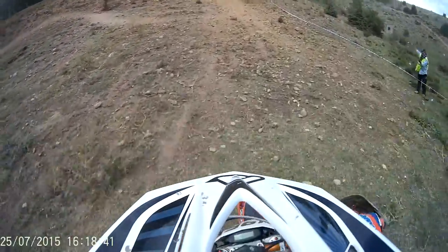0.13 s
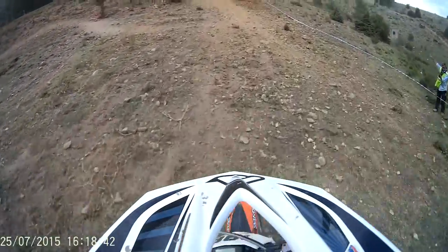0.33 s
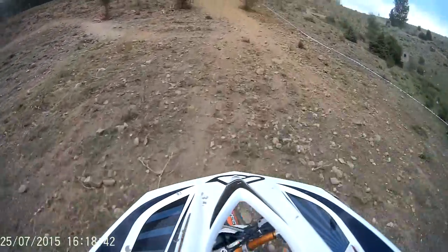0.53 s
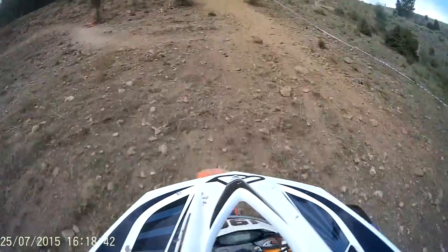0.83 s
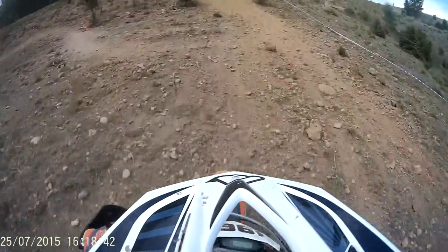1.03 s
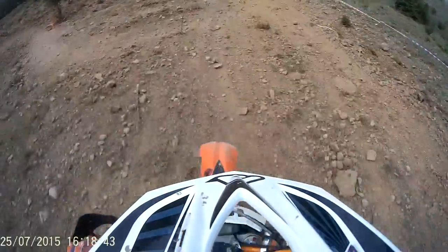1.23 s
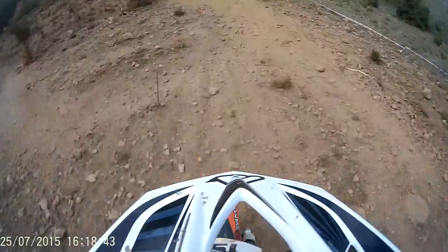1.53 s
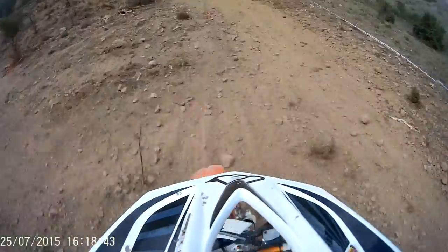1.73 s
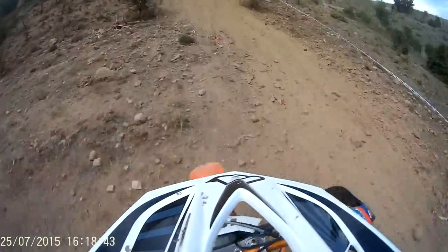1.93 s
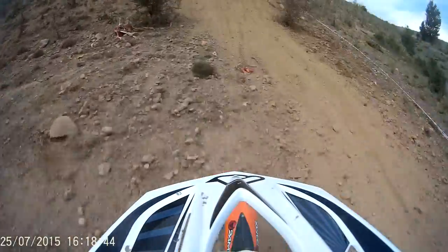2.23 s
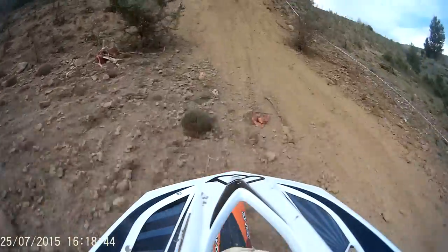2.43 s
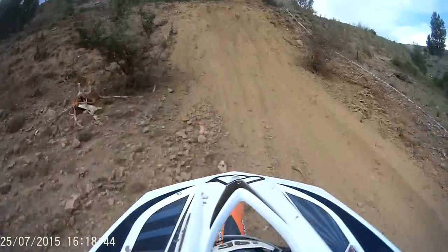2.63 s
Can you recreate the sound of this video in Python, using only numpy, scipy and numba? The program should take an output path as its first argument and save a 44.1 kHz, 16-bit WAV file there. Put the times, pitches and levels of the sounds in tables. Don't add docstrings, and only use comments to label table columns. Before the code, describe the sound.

Muffled, raspy two-stroke motorcycle surges, stumbles and pulls harder while climbing a dirt slope

```python
import sys
import numpy as np
from scipy import signal
from scipy.io import wavfile
from scipy.ndimage import uniform_filter1d
from numba import njit

SR = 44100
rng = np.random.default_rng(int(sys.argv[2]) if len(sys.argv) > 2 else 0)


def convert_level_to_amplitude(level_db):
    exponent = np.asarray(level_db, float) / 20
    return 10 ** exponent


def to_wav(s):
    ch = np.atleast_2d(s).T
    pcm = np.round(np.clip(ch, -1, 1) * 32767)
    wavfile.write(sys.argv[1], SR, pcm.astype(np.int16))


N = 123479

# time in seconds, firings in Hz.
CRANK_SPEED = [(0, 72.8), (.1, 69.33), (.24, 68.88), (.45, 80.13), (.54, 85.47), (.66, 92.47), (.73, 104.9),
               (.88, 84.13), (1.08, 87.84), (1.39, 81.65), (1.53, 107.3), (1.68, 118.1), (1.8, 124.8),
               (2.09, 81), (2.22, 112.5), (2.33, 110.2), (2.53, 119.3), (2.8, 152)]
# time in seconds, rise in
# Hz, half width in seconds.
WHEEL_SKIPS = [(0.334, 13, .05), (0.497, 1, 0.022), (0.603, 16.5, .03), (0.958, 2.5, 0.044),
               (1.198, 12.5, .06), (1.298, -2.5, 0.035), (1.422, 0.5, 0.059), (1.512, 3, 0.021),
               (1.566, -2, 0.019), (1.628, 13, .035), (1.759, 1.5, 0.026), (1.952, -5.5, 0.051),
               (2.12, -3.5, 0.026), (2.589, 3, 0.037), (2.658, 0, 0.015), (2.719, 5, .04)]
# time in seconds, level in dB, roughness 0-1, boom in dB.
EXHAUST = [(0, -20, 0, 6), (.06, -24, 0, 6.5), (.11, -27, 0.14, 14), (.27, -19.5, 0.12, 1.5),
           (.43, -15, 0.1, 0), (.58, -13, .06, 6), (.7, -15, 0.2, -4.5), (.75, -20, 0.55, 0),
           (.9, -19.5, 0.11, 2), (1.18, -16, 0.11, -1.5), (1.4, -20, 0.2, 2), (1.49, -9, 0.15, 1),
           (1.785, -11, 0.04, 3), (1.83, -25, 0.7, 1), (2.04, -27, 0.65, 3.5), (2.1, -14.5, 0.2, -2),
           (2.33, -11, .06, 3.5), (2.8, -11.5, 0.15, 6)]
# time in seconds, airbox level in dB, airbox note in Hz.
THROTTLE = [(0, -28, 336), (.25, -33, 355), (.36, -30, 350), (.47, -16.5, 305.6), (.6, -12, 449),
            (.7, -26, 463), (.76, -30, 388), (1.4, -32, 405), (1.5, -9.5, 383), (1.63, -12.5, 463.4),
            (1.785, -8, 491.3), (1.83, -41, 447.4), (2.06, -24.5, 408), (2.3, -13, 411.4),
            (2.36, -8, 344.7), (2.53, -4, 403.6), (2.6, -5.5, 505.6), (2.8, -4.5, 546)]
# end in seconds, fade length in seconds, depth in dB.
STUMBLES = [(.768, .04, 9), (.835, .045, 10), (.872, .026, 13), (1.284, .04, 14), (1.331, .02, 13),
            (1.367, .02, 16), (1.404, .012, 4), (1.893, .04, 7), (1.955, .04, 8), (2.025, .05, 7),
            (2.084, .03, 3), (.664, .024, -4), (2.232, .012, -2), (1.62, .05, 1.8), (2.69, .04, 1.8),
            (2.62, .07, -1.8), (1.54, .06, -1.8), (1.785, .09, -1.5), (2.325, .05, 2.2)]
# centre in Hz, width in Hz, level in dB, polarity +1 or -1.
PIPE_MODES = [(113, 71, -14.5, -1), (522.8, 58.8, -4, 1), (667, 87.5, -3.5, -1), (889, 59, -25, -1),
              (402, 94, -12.5, -1), (755, 70, -11.5, 1)]
# centre in Hz, width in Hz, level in dB.
TINWARE_BANDS = [(817, 130, 9.5), (1019, 130, -1), (1383, 190, 0), (1910, 350, -7.5), (2510, 1000, -30),
                 (4830, 2800, -20)]
# delay in seconds, share 0-1.
SCATTERERS = [(.0023, 0.43), (.0037, 0.33)]
# frequency in Hz, level in dB per Hz.
WIND_SPECTRUM = [(12, -56), (20, -34), (65, -4.5), (124, 3.5), (178, -1), (200, 0), (260, -30), (440, -120)]
# start in seconds, level in dB.
KNOCKS = [
    (.404, -46),
    (0.415, -26.5),
    (.425, -34),
    (.434, -47.5),
    (0.784, -23.5),
    (0.788, -39),
    (0.798, -33.5),
    (.803, -40),
]
# frequency in Hz, level in dB, 60 dB decay in seconds.
CASE_MODES = [(1520, 3, .055), (1770, -2, .05), (2060, -5, .04), (2200, -1, .035), (2420, -4, .045),
              (2650, -13, .03), (3500, -24, .02), (5300, -26, .012)]


def curve(table, column):
    rows = np.array(table, float)
    return np.interp(np.arange(N) / SR, rows[:, 0], rows[:, column])


def to_rms(x, db):
    return x * convert_level_to_amplitude(db) / np.sqrt(np.mean(x ** 2))


@njit
def resonate(x, hz, width):
    y, b, l = np.empty(len(x)), 0., 0.
    for i in range(len(x)):
        g, k = np.tan(np.pi * hz[i] / SR), width / hz[i]
        v = (b + g * (x[i] - l)) / (1 + g * (g + k))
        b, l, y[i] = 2 * v - b, l + 2 * g * v, k * v
    return y


def band(x, hz, width_hz):
    return resonate(x, hz + np.zeros(N), float(width_hz))


def lowpass(x, order, hz):
    return signal.sosfilt(signal.butter(order, hz, fs=SR, output="sos"), x)


def walk(rate):
    k = int(SR / rate)
    steps = np.repeat(rng.standard_normal(N // k + 1), k)
    return 1.3 * uniform_filter1d(uniform_filter1d(steps, k), k)[:N]


def clicks(at, size):
    out, i = np.zeros(N + 2), np.clip(at, 0, N).astype(int)
    np.add.at(out, i, size * (1 - at % 1))
    np.add.at(out, i + 1, size * (at % 1))
    return out[:N]


def crank():
    t = np.arange(N) / SR
    flares = sum(rise * np.exp(-((t - s) / w) ** 2) for s, rise, w in WHEEL_SKIPS)
    hz = curve(CRANK_SPEED, 1) + flares
    return hz, np.cumsum(hz) / SR


def stumble():
    t, lead_s = np.arange(N) / SR, 0.0021
    thin, catch = np.zeros(N), np.zeros(N)
    for s, fade, depth in STUMBLES:
        before = t < s - lead_s
        thin += depth * np.clip(1 - (s - t) / fade, 0, 1) ** .5 * before
        if depth > 7.5:
            catch += np.exp(-np.abs(t - s) / 0.018) * (t > s - lead_s)
    return thin, 2.5 * catch


def exhaust(at, unit, hz, turns, thin, catch):
    i, gas_db = at.astype(int), 4
    rough, pipe_db = curve(EXHAUST, 2), curve(EXHAUST, 1)
    late, strength = rng.standard_normal((2, len(at)))
    fired_db = (pipe_db - thin + catch)[i] + 7 * rough[i] * np.clip(strength, -3, 1)
    jitter = 0.03 * rough[i] * late * SR / hz[i]
    fired = clicks(at + jitter, unit * convert_level_to_amplitude(fired_db))
    gas = np.exp(-(turns % 1) / 1.2) * rng.standard_normal(N)
    drive = fired + gas * rough * convert_level_to_amplitude(pipe_db - 0.25 * thin + gas_db)
    pipe = sum(np.sign(p) * convert_level_to_amplitude(d) * band(drive, f, w) for f, w, d, p in PIPE_MODES)
    boom = convert_level_to_amplitude(curve(EXHAUST, 3)) * band(drive, 270, 40.4)
    return pipe + boom


def airbox(at, unit, thin):
    i, lag_s, width_hz, gas_db = at.astype(int), 0.00311, 149.5, 4
    throttle_db, note = curve(THROTTLE, 1), curve(THROTTLE, 2)
    pulse_db = throttle_db[i] - thin[i] + rng.standard_normal(len(at))
    sucked = clicks(at + lag_s * SR, unit * convert_level_to_amplitude(pulse_db))
    sucked = sucked + 0.092 * convert_level_to_amplitude(throttle_db + gas_db) * rng.standard_normal(N)
    bark = band(band(sucked, note, width_hz), note, 0.83 * width_hz)
    return bark - convert_level_to_amplitude(-11.5) * band(sucked, 250, 37)


def tinware(turns):
    follow, rattle_db = .4, -50
    buzz_db = follow * (curve(EXHAUST, 1) + 21.5) + rattle_db + walk(68)
    shake = 1.67 + np.exp(-(turns % 1) / 0.65)
    buzz = convert_level_to_amplitude(buzz_db) * shake * rng.standard_normal(N)
    return convert_level_to_amplitude(15) * sum(convert_level_to_amplitude(d) * band(band(buzz, f, w), f, 2 * w) for f, w, d in TINWARE_BANDS)


def engine():
    hz, turns = crank()
    thin, catch = stumble()
    at = np.interp(np.arange(int(turns[-1]) + 1), turns, np.arange(N))
    unit = np.sqrt(SR / hz[at.astype(int)])
    body = exhaust(at, unit, hz, turns, thin, catch) + airbox(at, unit, thin)
    return convert_level_to_amplitude(23) * body, tinware(turns)


def smear(x):
    for s, share in SCATTERERS:
        d = np.zeros(int(s * SR) + 1)
        d[0], d[-1] = 1, -np.clip(share, 0, .4)
        x = signal.lfilter(d[::-1], d, x)
    return x


def muffle(body):
    lows = signal.sosfilt(signal.cheby1(6, 1, 848, fs=SR, output="sos"), body)
    above = signal.sosfilt(signal.butter(3, [800, 1000], "band", fs=SR, output="sos"), body)
    return lows + convert_level_to_amplitude(-6) * above


def wind():
    hz, db = np.array(WIND_SPECTRUM).T
    low = np.zeros(N)
    for f in (25, 40, 63, 100):
        gust_db = np.interp(np.log(f), np.log(hz), db) + 3 * walk(15)
        low += convert_level_to_amplitude(gust_db) * band(rng.standard_normal(N), f, f / 2)
    buffeting = to_rms(lowpass(low, 2, 250), -40) * convert_level_to_amplitude(0.1 * (curve(EXHAUST, 1) + 9))
    return buffeting + to_rms(rng.standard_normal(N), -74)


def knocks():
    rows, t = np.array(KNOCKS), np.arange(2600) / SR
    taps = clicks(rows[:, 0] * SR, convert_level_to_amplitude(rows[:, 1]))
    scrape = np.exp(-t[:900] / 0.007) * rng.standard_normal(900)
    taps = taps + 0.064 * np.convolve(taps, scrape)[:N]
    ring = sum(convert_level_to_amplitude(d) * np.sin(2 * np.pi * f * t) * np.exp(-np.log(1000) * t / t60)
               for f, d, t60 in CASE_MODES)
    return convert_level_to_amplitude(-7) * lowpass(np.convolve(taps, ring)[:N], 4, 5600)


def scene():
    body, rattle = engine()
    heard = muffle(smear(body)) + lowpass(rattle, 3, 2700)
    return (heard + wind() + knocks())[None]


def roll_off(x):
    return signal.sosfilt(signal.butter(12, 15800, fs=SR, output="sos"), x)


def record(dry):
    clipped = np.clip(dry, -.695, .705)
    return roll_off(clipped)


dry = scene()
out = record(dry)
to_wav(out)
```